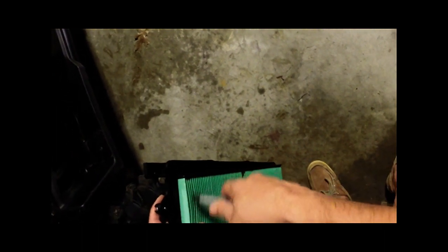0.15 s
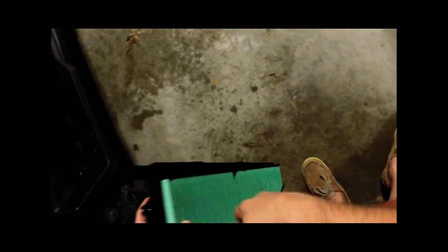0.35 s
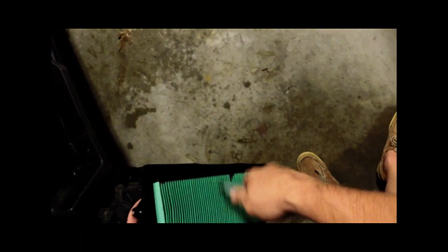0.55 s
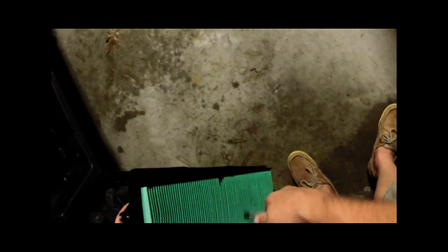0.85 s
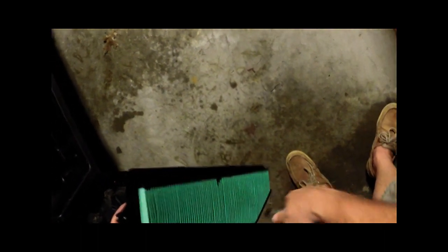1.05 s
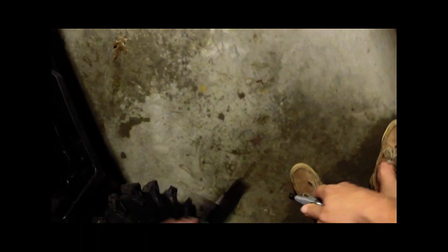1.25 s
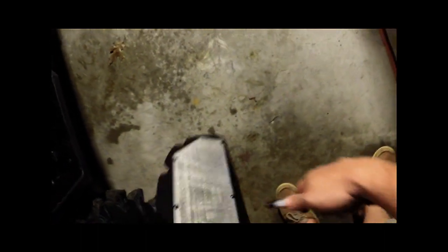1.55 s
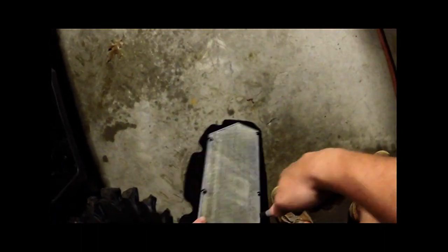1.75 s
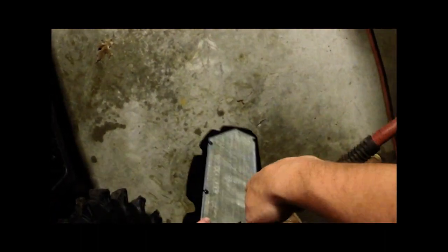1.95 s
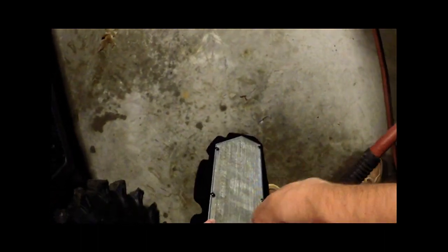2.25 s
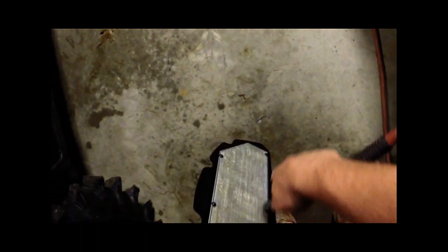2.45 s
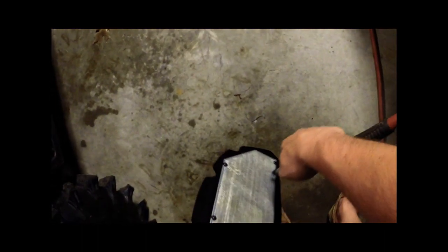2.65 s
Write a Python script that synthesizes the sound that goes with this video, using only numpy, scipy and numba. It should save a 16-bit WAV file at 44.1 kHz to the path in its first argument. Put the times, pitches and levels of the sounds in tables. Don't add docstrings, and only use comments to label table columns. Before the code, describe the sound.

Harsh air-nozzle hiss sweeps over paper pleats, cuts off for a moment, and resumes in a garage.

```python
import sys
import numpy as np
from scipy import signal
from scipy.fft import rfft, irfft, next_fast_len
from scipy.io import wavfile
from scipy.ndimage import uniform_filter1d
from numba import njit

SR = 44100
rng = np.random.default_rng(int(sys.argv[2]) if len(sys.argv) > 2 else 0)


def volts(x):
    e = np.asarray(x, float) / 20
    return 10 ** e


def bounce(signal):
    frames = np.transpose(np.atleast_2d(signal))
    limited = np.clip(frames, -1, 1)
    pcm = np.round(limited * 32767).astype(np.int16)
    wavfile.write(sys.argv[1], SR, pcm)


N = 123479

# (time [s], strength [dB], depth into a pleat [-1.6..1], jet on an edge
# [0..1], pocket howl [dB])
NOZZLE_SWEEP = [(0, 1, -0.82, 0.52, 6), (.09, -1.5, 0.031, 0.38, 4.5), (.17, 1, -1.6, 0.43, 12),
                (.29, -1.5, 0.014, 0.55, 0), (.36, 0.5, -0.84, 0.6, 1), (.47, 1.5, -0.53, 0.35, -3),
                (.72, -2, -0.77, 0.28, -2.5), (0.841, 0, .6, 0.47, 1.5), (.93, -1, -1.26, 0.32, -3),
                (1.02, 1, 0.37, 0.5, 0.5), (1.1, 0, -0.39, 0, -11), (1.86, 4, -.5, 0.45, -1),
                (1.95, 3, 0.83, 0.05, 0.8), (2.18, -0.5, -0.056, 0.43, -2.8), (2.4, -1.5, -.4, 0, 2.5),
                (2.47, -2.5, 0.36, 0, 6), (2.58, -1.5, -0.42, 0, 2), (2.8, -2.5, 0.15, 0.95, -3.5)]
# (time [s], length [s], strength [dB], added depth [-], added edge [-])
RIB_PASSES = [
    (0.591, 0.042, 2, 1.6, 0.91),
    (2.282, 0.016, 4.5, -0.056, 0.052),
    (2.345, 0.021, -5, -0.098, 0.084),
]
# (frequency [Hz], density [dB per Hz])
JET_SPECTRUM = [(120, -37.5), (250, -22), (600, -13), (1400, -6), (3440, -6.5), (7600, -6.5), (10500, -9),
                (14600, -16.5)]
# (frequency [Hz], width [Hz], level [dB], per depth [dB], per edge [dB],
# share of pitch lost at low pressure [-], level lost at low pressure [dB])
RESONANCES = [(560, 370, -21.5, 2.7, 0.5, .01, 5.4), (1026, 420, -21, 1.6, 13.5, .02, 9.2),
              (2168, 420, -12, 2.7, 4.5, .03, 1.5), (3120, 700, -16.5, 3.7, 3.5, .02, 14),
              (4204, 500, -8.5, 2, -3, .02, 18), (4777, 610, -8.5, 1.5, -0.3, .02, 15),
              (5316, 160, -10.5, -0.8, 1.4, .02, 8.2), (6080, 980, -6, -2.5, -2, .08, .3),
              (6846, 730, -5, -4, -12, 0.17, .3)]
# (frequency [Hz], density [dB])
RUMBLE_SPECTRUM = [(25, -8), (110, -9), (350, -17.5), (700, -23), (1500, -28), (4200, -35), (5000, -45),
                   (15000, -66.5)]
# (frequency [Hz], density [dB])
HISS_SPECTRUM = [(1500, -10), (4200, 0), (5200, -2), (6500, -6), (8000, -12), (11000, -18), (15000, -23)]
# (time [s], length [s], depth [dB])
RUMBLE_LULLS = [
    (.66, 0.045, -8),
    (.8, 0.065, -3),
    (0.956, 0.019, -10),
    (2.103, 0.037, -10),
    (2.415, .05, -6),
]
# (time [s], length [s], level [dB], frequency [Hz], width [Hz])
RUSTLES = [
    (1.63, .03, -52, 830, 300),
    (1.3, 0.043, -60, 1040, 300),
    (1.665, 0.022, -50, 320, 80),
    (1.873, 0.015, -31, 315, 45),
    (2.12, 0.0377, -47, 32, 23),
    (0.574, 0.025, -47, 110, 110),
]

SHUT_S, OPEN_S = 1.1106, 1.7124
OPEN_FROM_DB = -34


def unit(x):
    return x / np.sqrt(np.mean(x ** 2))


def walk(rate):
    hold = int(SR / rate)
    steps = np.repeat(rng.standard_normal(N // hold + 1), hold)[:N]
    return unit(uniform_filter1d(uniform_filter1d(steps, hold), hold))


def bump(t, at, length):
    return np.exp(-.5 * ((t - at) / length) ** 2)


@njit
def svf(x, hz, width):
    y, band, low = np.empty(len(x)), 0., 0.
    for i in range(len(x)):
        g, k = np.tan(np.pi * hz[i] / SR), width / hz[i]
        v = (band + g * (x[i] - low)) / (1 + g * (g + k))
        band, low, y[i] = 2 * v - band, low + 2 * g * v, k * v
    return y


def ring(hz, width):
    hz = hz + np.zeros(N)
    once = svf(rng.standard_normal(N), hz, 1.32 * width)
    return unit(svf(once, hz, 1.32 * width))


def coloured(table, flicker_db):
    size = next_fast_len(N, True)
    hz, table = np.arange(1, size // 2 + 2) * SR / size, np.array(table, float)
    shape_db = np.interp(np.log(hz), np.log(table[:, 0]), table[:, 1])
    spectrum = rfft(rng.standard_normal(size)) * volts(shape_db)
    place = 2 * np.log2(hz / 20)
    out = np.zeros(N)
    for k in range(20):
        crossfade = np.cos(np.pi / 2 * np.clip(place - k, -1, 1)) ** 2
        out = out + irfft(spectrum * crossfade, size)[:N] * volts(flicker_db * walk(14))
    return unit(out)


def valve(t):
    shut_db_per_s, knee_s = 177.5, 0.024
    open_tau_s, open_edge_db_per_s = 0.058, 6000
    shut = -shut_db_per_s * knee_s * np.logaddexp(0, (t - SHUT_S) / knee_s)
    since = t - OPEN_S
    opened = OPEN_FROM_DB * np.exp(-np.maximum(since, 0) / open_tau_s)
    opened = opened + open_edge_db_per_s * np.minimum(since, 0)
    return np.maximum(shut, opened)


def aim(t):
    s, *columns = np.array(NOZZLE_SWEEP, float).T
    db, depth, edge, howl = (uniform_filter1d(np.interp(t, s, c), size=600) for c in columns)
    for at, length, rib_db, rib_depth, rib_edge in RIB_PASSES:
        near = bump(t, at, length)
        db, depth, edge = db + rib_db * near, depth + rib_depth * near, edge + rib_edge * near
    return db, depth, edge, howl


def jet(db, depth, edge, low):
    level_db = -3.0 - .5001 * db + 1.2 * depth - 0.1 * edge - 22 * low
    return volts(level_db) * coloured(JET_SPECTRUM, .5)


def pleats(t, depth, edge, howl, low, fading):
    drift, wander_db, flutter_db = 0.0095, 0.97, 2.19
    howl_hz, turned_db, turned_below_hz = 2150, -12, 800
    out = np.zeros(N)
    for hz, width, level_db, per_depth, per_edge, sag, lag_db in RESONANCES:
        gain_db = level_db + per_depth * depth + per_edge * edge - lag_db * (low + fading)
        gain_db = gain_db + wander_db * walk(7) + flutter_db * walk(39.58)
        gain_db = gain_db + turned_db * (t > OPEN_S) * (hz < turned_below_hz)
        gain_db = gain_db + howl * (abs(hz / howl_hz - 1) < .2)
        pitch = hz * (1 - sag * low + drift * walk(6.34))
        out = out + volts(gain_db) * ring(pitch, 1. * width)
    return out


def blow_gun(t):
    fade_share = 0.22
    db, depth, edge, howl = aim(t)
    flow = valve(t)
    lack = np.clip(flow / OPEN_FROM_DB, 0, 1)
    low = np.where(t > OPEN_S - .1, lack, 0)
    fading = fade_share * np.where(t < OPEN_S - .1, lack, 0)
    air = jet(db, depth, edge, low) + pleats(t, depth, edge, howl, low, fading)
    return air * volts(-17.5 + db + flow + 0.48 * walk(29.88))


@njit
def walls(x, lags, gain, damp):
    line, soft, out = np.zeros((8, 4096)), np.zeros(8), np.zeros(len(x))
    for i in range(len(x)):
        total = 0.
        for k in range(8):
            soft[k] += (1 - damp) * (gain[k] * line[k, (i - lags[k]) & 4095] - soft[k])
            total += soft[k]
        out[i] = soft[0] - soft[1] + soft[2] - soft[3] + soft[4] - soft[5] + soft[6] - soft[7]
        for k in range(8):
            line[k, i & 4095] = x[i] + soft[k] - total / 4
    return out


def garage_tail(gun):
    t60_s, damp, level_db = 0.6, 0.19, -16
    lags = np.array([701, 887, 1093, 1303, 1531, 1777, 2053, 2339])
    return volts(level_db) * walls(gun, lags, volts(-60 * lags / SR / t60_s), damp)


def room_floor(t):
    sag_db = sum(db * bump(t, at, length) for at, length, db in RUMBLE_LULLS)
    rumble = volts(-47.5 + sag_db) * coloured(RUMBLE_SPECTRUM, 2.1)
    return rumble + volts(-65) * coloured(HISS_SPECTRUM, 0.69)


def circuit_tick(t):
    hz, first_s, length_s, per_s, level_db = 11600, .0175, .0025, 29.97, -77
    since = ((t - first_s) * per_s + .5) % 1 - .5
    return volts(level_db) * bump(since / per_s, 0, length_s) * np.sin(2 * np.pi * hz * t)


def paper_rustle(t):
    out = np.zeros(N)
    for at, length, db, hz, width in RUSTLES:
        out = out + volts(db) * bump(t, at, length) * ring(1. * hz, 1. * width)
    return out


def scene():
    t = np.arange(N) / SR
    gun = blow_gun(t)
    mono = gun + garage_tail(gun) + room_floor(t) + paper_rustle(t)
    return np.array([mono, mono])


def roll_off(x):
    return signal.sosfilt(signal.butter(12, 16130, fs=SR, output="sos"), x)


def record(dry):
    t = np.arange(N) / SR
    notch_hz, notch_width_hz, notch_share = 5250, 230., 0.97
    ceiling, top_hz = 1.63, 15310
    x = dry - notch_share * svf(dry[0], notch_hz + 0 * t, notch_width_hz) + circuit_tick(t)
    x = ceiling * np.tanh(x / ceiling)
    x = signal.sosfilt(signal.ellip(16, .2, 90, top_hz, fs=SR, output="sos"), x)
    return roll_off(x)


dry = scene()
out = record(dry)
bounce(out)
```